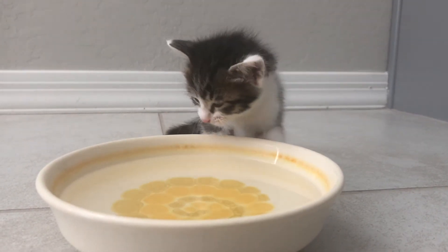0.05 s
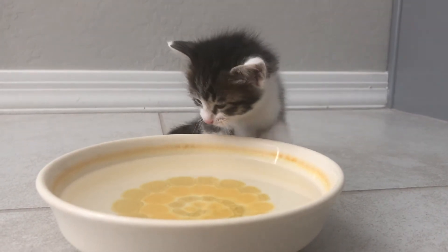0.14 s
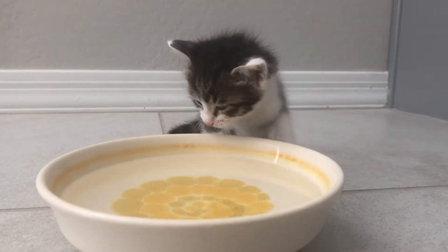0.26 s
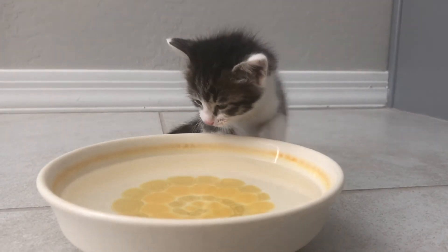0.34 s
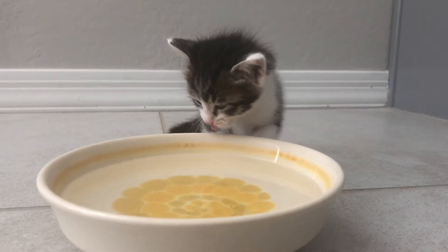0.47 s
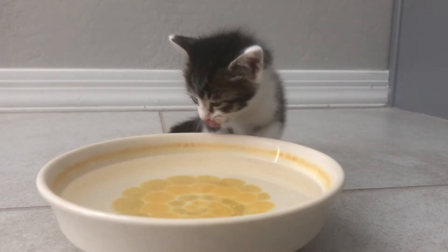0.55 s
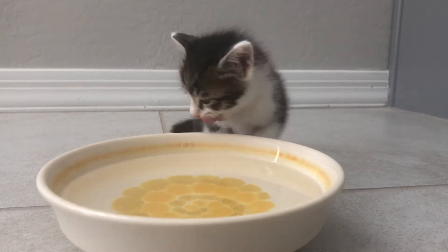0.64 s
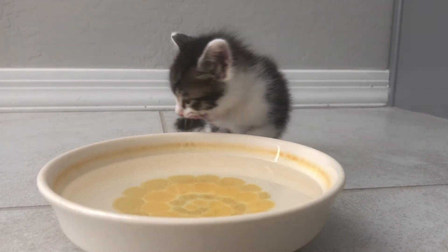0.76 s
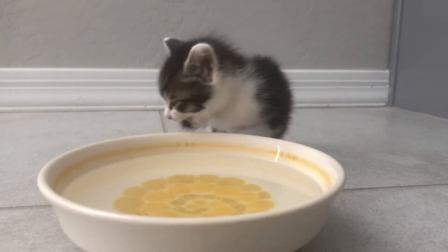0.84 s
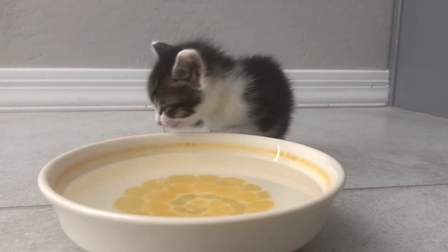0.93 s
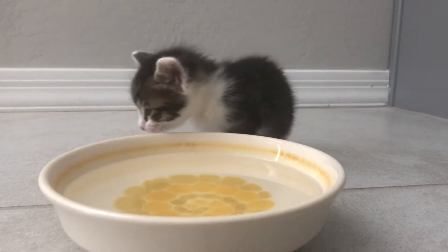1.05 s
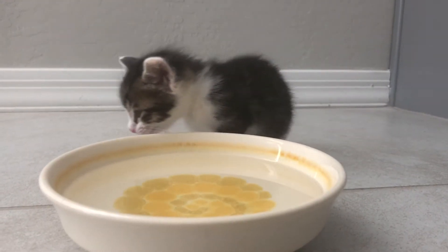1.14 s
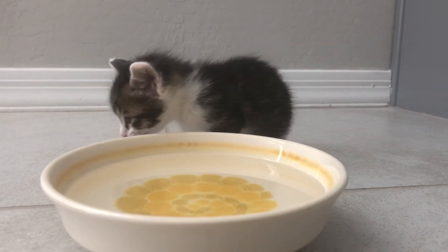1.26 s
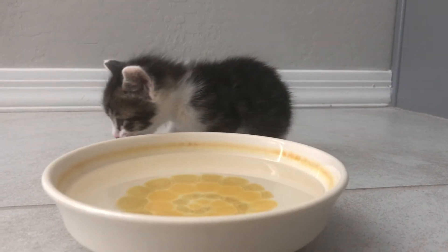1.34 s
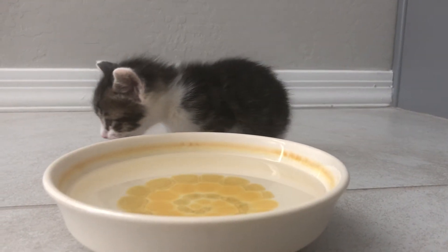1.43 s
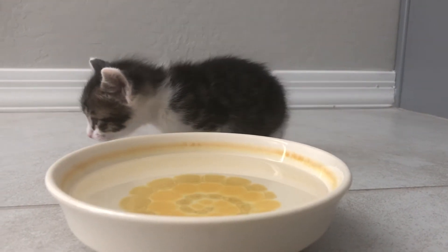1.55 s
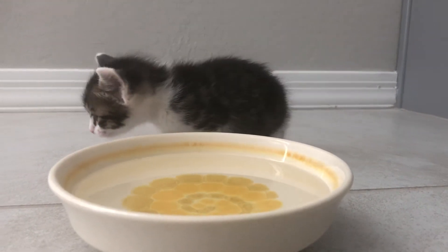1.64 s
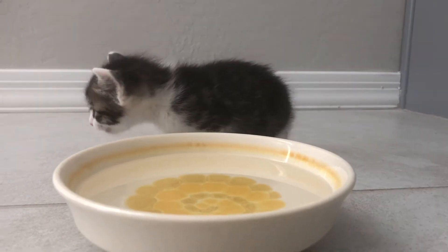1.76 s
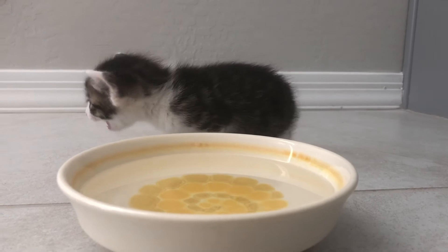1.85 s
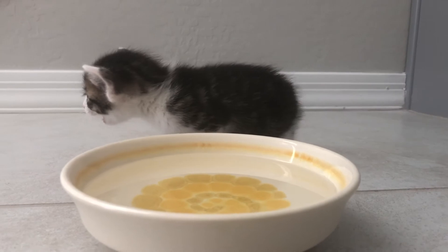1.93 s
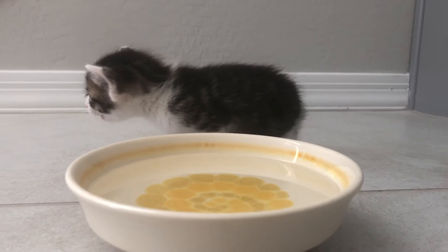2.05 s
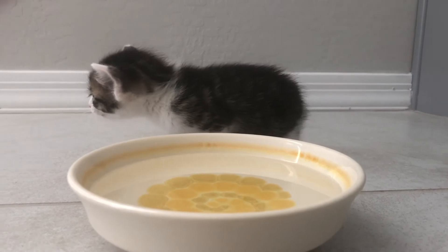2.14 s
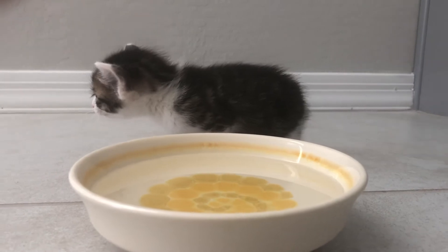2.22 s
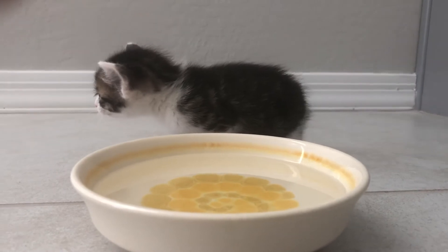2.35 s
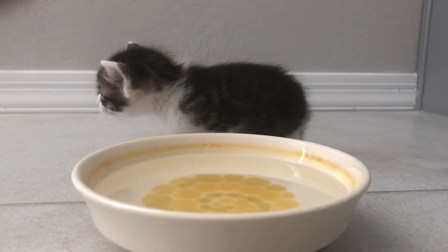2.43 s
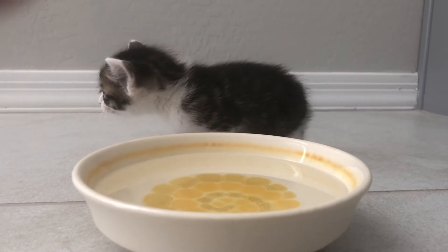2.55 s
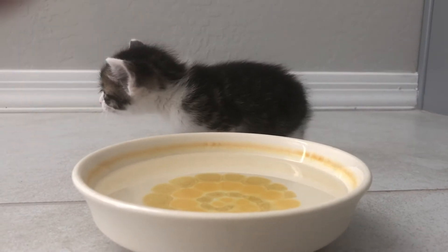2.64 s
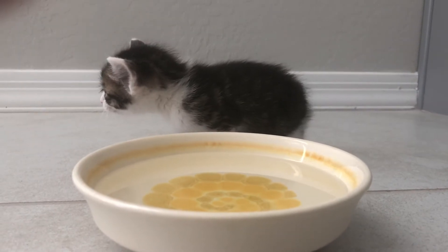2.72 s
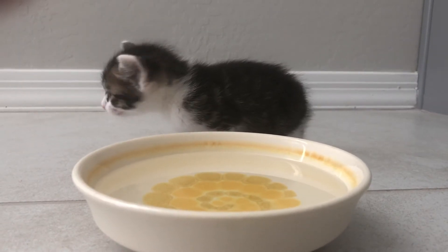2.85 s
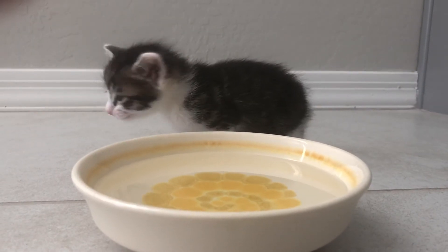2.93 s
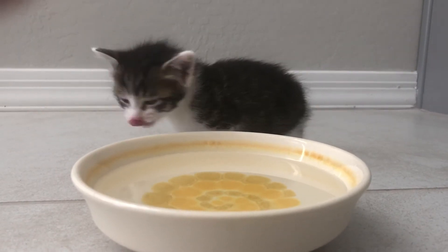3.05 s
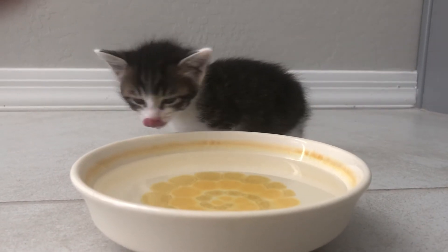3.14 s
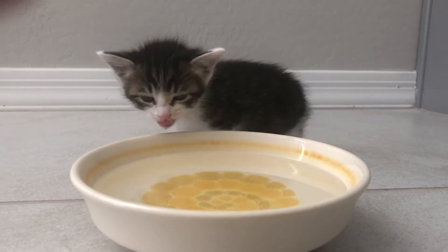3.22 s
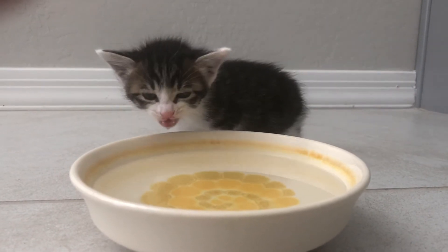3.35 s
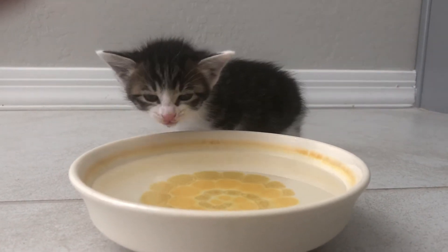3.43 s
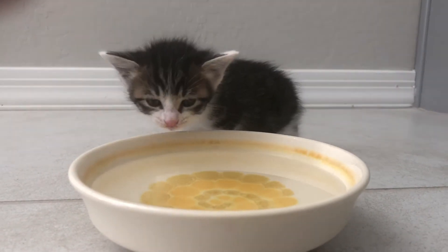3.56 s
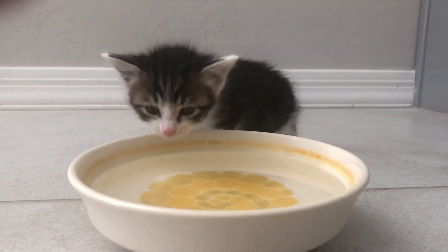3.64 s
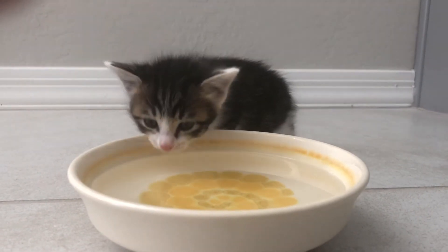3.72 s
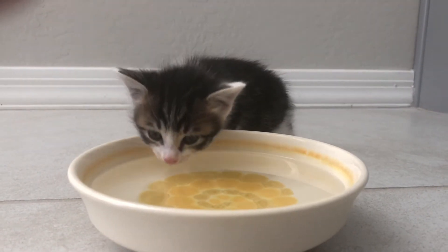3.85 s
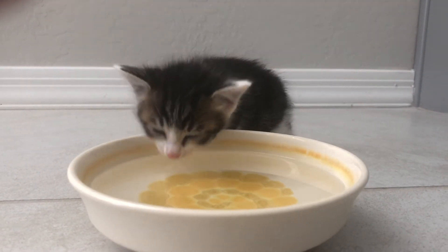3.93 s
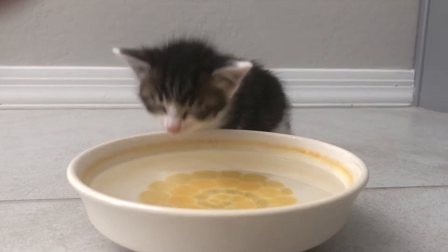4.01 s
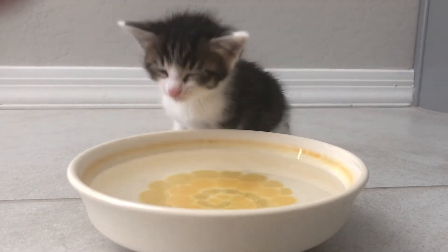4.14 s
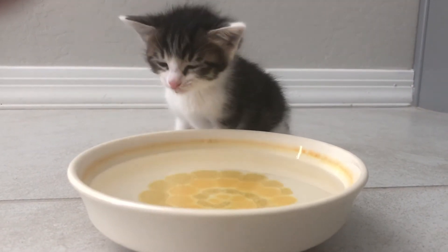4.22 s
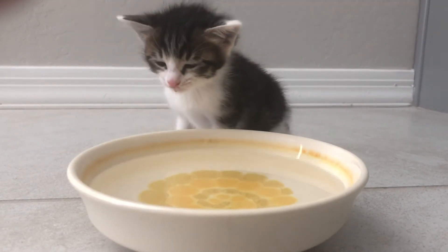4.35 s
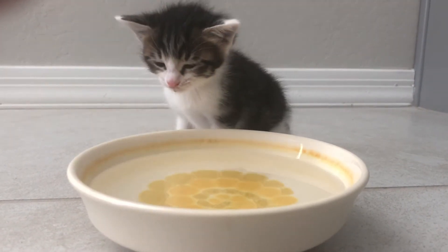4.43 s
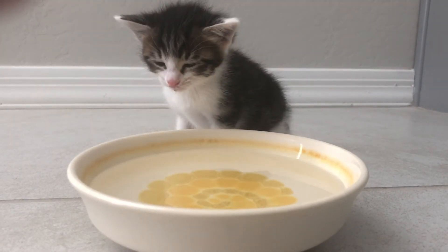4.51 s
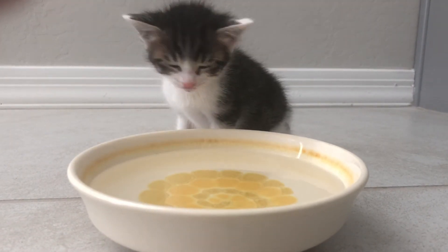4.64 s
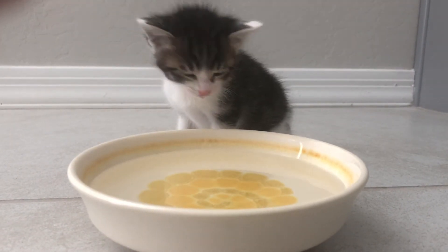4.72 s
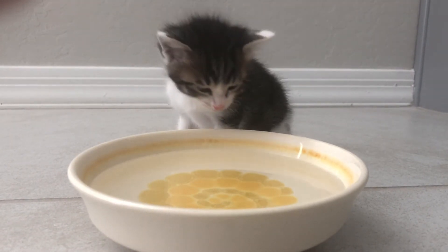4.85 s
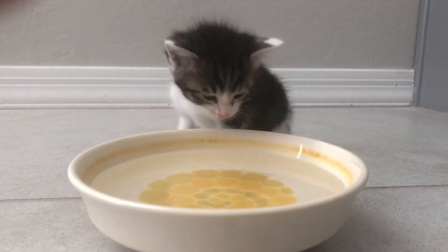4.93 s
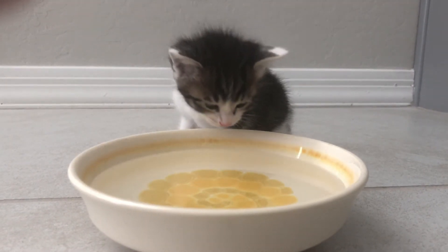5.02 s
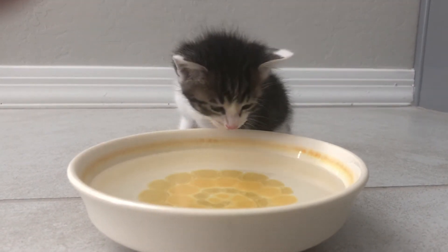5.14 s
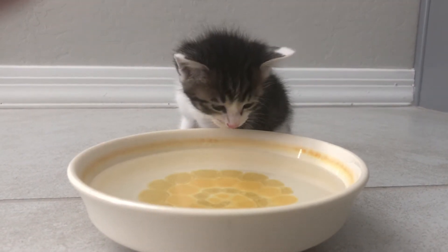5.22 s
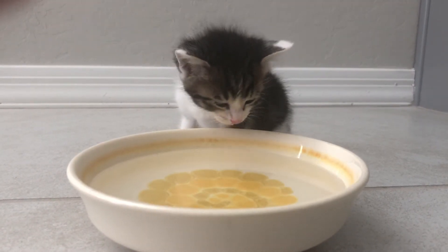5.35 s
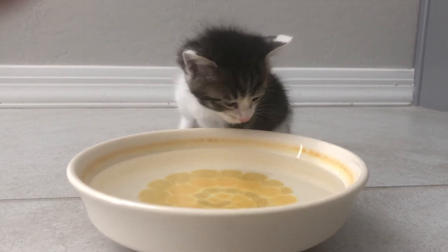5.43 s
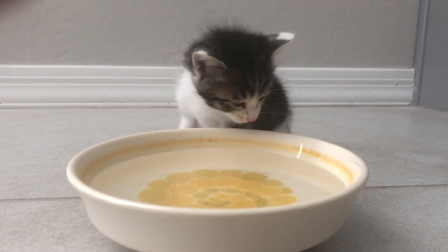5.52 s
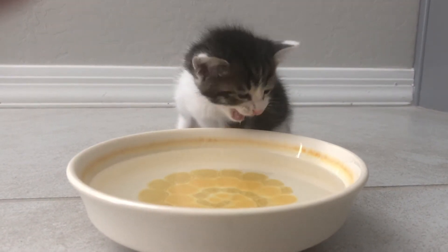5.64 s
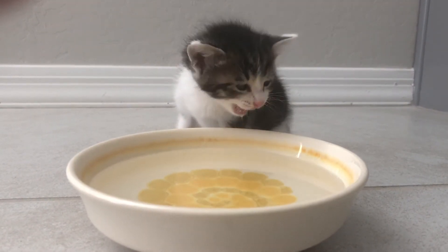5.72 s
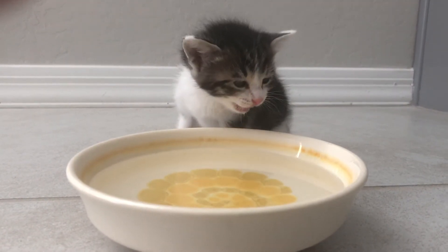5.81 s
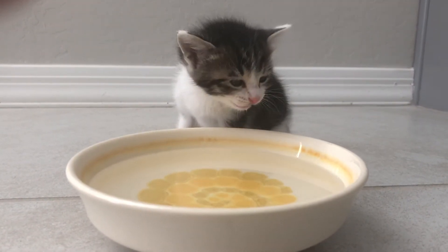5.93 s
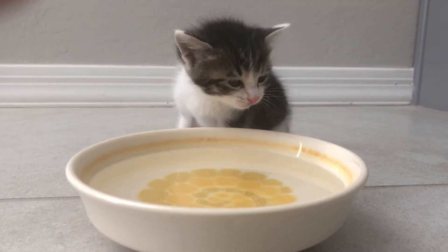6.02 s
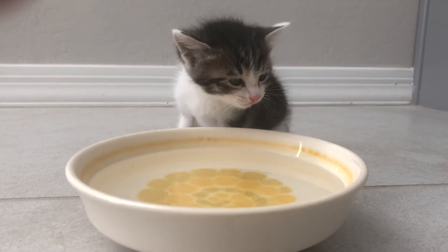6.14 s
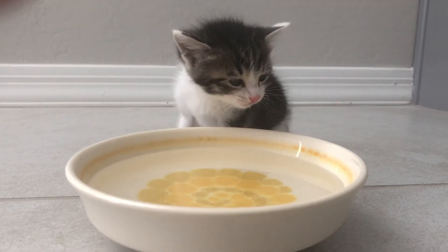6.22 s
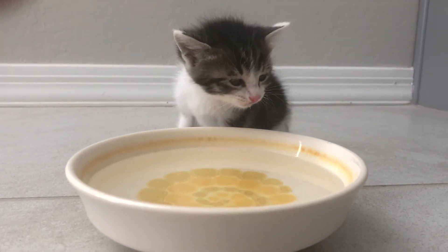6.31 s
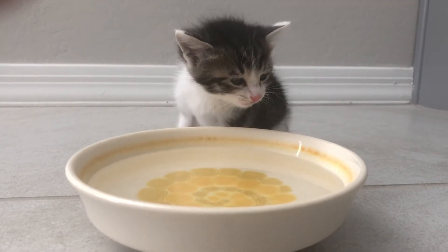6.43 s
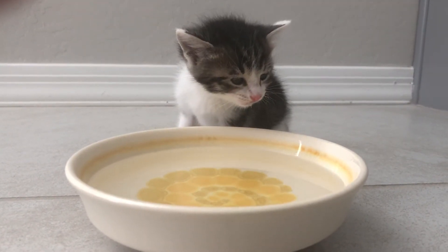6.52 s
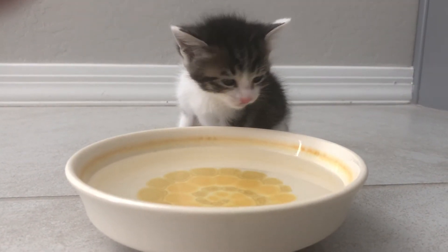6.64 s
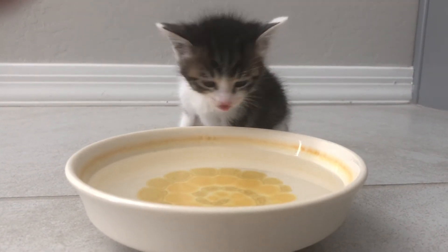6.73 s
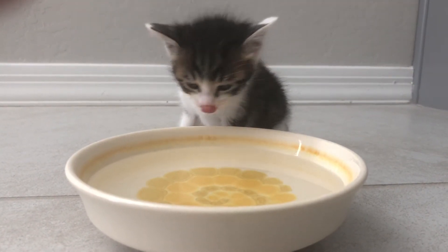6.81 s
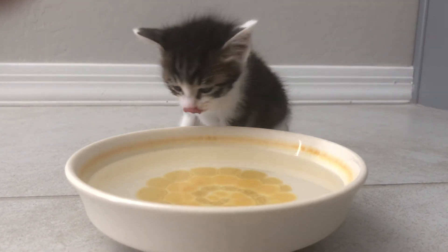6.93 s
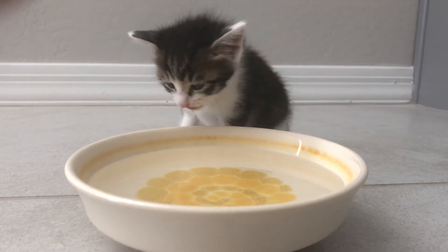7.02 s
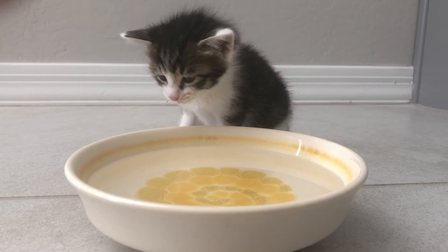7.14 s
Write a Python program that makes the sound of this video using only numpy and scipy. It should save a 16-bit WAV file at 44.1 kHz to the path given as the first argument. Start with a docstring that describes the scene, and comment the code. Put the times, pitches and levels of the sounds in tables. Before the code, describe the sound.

Three short, high kitten meows echo off hard walls, with tiny mouth clicks and a low, steady ventilation hum.

```python
"""Three thin kitten meows ring out in a bare tiled room, over a faint rumble of ventilation.
Each meow is a buzz from the vocal folds that rises and falls in pitch as the mouth opens and shuts.
Before them, one light tap sets a china water bowl ringing; lips, tongue and claws add tiny clicks.
The hard floor and walls send the kitten's sounds and the tap back as echoes."""
import sys
import numpy as np
from scipy import signal
from scipy.fft import rfft, irfft, next_fast_len
from scipy.io import wavfile
from scipy.ndimage import uniform_filter1d

SR = 44100
rng = np.random.default_rng(int(sys.argv[2]) if len(sys.argv) > 2 else 0)


def bounce(signal):
    """Save signal as a 16-bit WAV file at the path given by the first command-line argument."""
    frames = np.transpose(np.atleast_2d(signal))
    limited = np.clip(frames, -1, 1)
    pcm = np.round(limited * 32767).astype(np.int16)
    wavfile.write(sys.argv[1], SR, pcm)


N = 316329


def kitten(beam_miss_share=0.33):
    """Three meows, each sent two ways: straight to the listener, and toward the walls."""
    # each meow's tune, an arch and then a small lift behind the closed mouth: (time [s], pitch [Hz])
    tunes = [[(1.841, 703), (1.86, 735), (1.875, 964), (1.9, 1072), (1.899, 1365), (1.936, 1357),
              (1.945, 1244), (1.991, 1269), (2.011, 1179), (2.111, 1107), (2.166, 1040), (2.243, 1164),
              (2.325, 979)], [(3.257, 895), (3.281, 1038), (3.304, 1110), (3.336, 1157), (3.369, 1182),
                               (3.405, 1160), (3.463, 1059), (3.475, 1116), (3.519, 1057), (3.569, 1042),
                               (3.599, 1158), (3.637, 1129), (3.669, 929)], [(5.612, 854), (5.631, 1031), (5.656, 1071), (5.686, 1199),
                                                (5.717, 1266), (5.757, 1232), (5.795, 1152), (5.857, 1065),
                                                (5.923, 1184), (5.953, 1114), (5.977, 1202), (6.029, 1049),
                                                (6.047, 954)]]
    # how each meow unfolds: (mouth wide at [s], starts closing at [s], narrowing time [s],
    # closing time [s], settling time [s], swell time [s], open level [dB], closed level [dB],
    # base roughness [0-1], pitch shake at full roughness [share], relative hiss [dB])
    meows = [(2.02, 2.171, 0.066, 0.02, 0.23, .04, -20, -36.5, 0.1, 0.034, 3),
             (3.343, 3.461, 0.055, 0.014, 0.29, 0.042, -16.5, -24.5, 0.08, 0.02, 6),
             (5.705, 5.833, 0.053, 0.093, .06, 0.071, -12, -30.5, 0.11, 0.036, 1)]
    # the mouth's resonances (the pitches it boosts) and the tilt from low to high overtones, per meow:
    # (parting jaw [Hz], wide jaw [Hz], parting tongue [Hz], wide tongue [Hz], lips [Hz],
    # wide lip boost [dB], narrow lip boost [dB], open tilt [dB/octave], closed tilt [dB/octave])
    mouths = [(3230, 2684, 5000, 4130, 10700, 7, 18.5, -2.5, -1),
              (2300, 3180, 5450, 5140, 10530, -2.5, 32.5, -1, -2),
              (2815, 2775, 5730, 4680, 11040, 15.5, 31.5, -2.5, 0.5)]
    # narrow dips in the tone, one list per meow: (centre [Hz], width [Hz], depth [dB])
    notches = [
        [(1100, 89, -13.5), (4120, 350, -7.5), (5470, 800, -15), (7625, 1500, -9)],
        [(1210, 63, -10), (3566, 270, -3.5), (6710, 380, -14), (9700, 500, -5.5)],
        [(1246, 42, -11), (6100, 300, -3.5), (8700, 1900, -3)],
    ]
    # what the turning head sends to the walls, per meow:
    # (level [dB], treble change [dB], centre of the beamed band [Hz], its boost [dB])
    headings = [(-2, -10.5, 5300, 23), (-5.5, -6.5, 3200, 14.5), (-2.3, 5, 4700, -4.5)]
    direct, to_walls = np.zeros(N), np.zeros(N)
    for tune, call, mouth, dips, heading in zip(tunes, meows, mouths, notches, headings):
        *effort, jitter, hiss_db = call
        wall_db, treble_db, beam_hz, beam_db = heading
        start_s = tune[0][0]
        cry = meow(voice_motion(tune, mouth, effort), dips, jitter, hiss_db)
        # a band beamed at the walls partly passes the listener by
        add(direct, start_s, head_turn(cry, 0, beam_hz, -beam_miss_share * beam_db))
        add(to_walls, start_s, from_db(wall_db) * head_turn(cry, treble_db, beam_hz, beam_db))
    return direct, to_walls


def meow(motion, dips, jitter, hiss_db, shimmer=0.35, rasp_db=-22.5, doubling=0.24, shut_db=-6):
    """The vocal folds buzz at whole multiples of the pitch (harmonics); the mouth boosts some of them."""
    # steady tone colour of throat and nose: (frequency [Hz], relative level [dB])
    throat = [(800, 9.6), (2300, 1.5), (3500, -10), (5000, -9.5), (6500, -10.5), (8000, -6), (11000, -13.5),
              (14000, -8.5), (16000, -18)]
    t, pitch, level_db, jaw_hz, tongue_hz, lip_hz, lip_db, tilt_db, rough = motion
    # the pitch glides smoothly, and shakes when the voice is rough
    pitch = uniform_filter1d(pitch, size=80, mode="nearest") * (1 + 0.0012 * wobble(60, len(t)))
    pitch = pitch * (1 + jitter * rough * wobble(350, len(t)))
    harmonics = np.arange(1, 18)[:, None]
    hz = harmonics * pitch
    phase = 2 * np.pi * np.cumsum(hz, axis=1) / SR
    colour_db = at_hz(throat, hz) + tilt_db * np.log2(harmonics)
    # each resonance lifts the harmonics near it and shifts their waves in time
    resonances = [(jaw_hz, 1370, 27.1), (tongue_hz, 2430, 29.9), (lip_hz, 3530, lip_db)]
    for centre_hz, width_hz, boost_db in resonances:
        distance = 2 * (hz - centre_hz) / width_hz
        colour_db += boost_db / (1 + distance ** 2)
        phase -= np.arctan(2 * distance)
    for centre_hz, width_hz, depth_db in dips:
        colour_db += depth_db / (1 + (2 * (hz - centre_hz) / width_hz) ** 2)
    # the shutting jaw muffles overtones but spares the lowest note
    shut = np.clip((1700 - jaw_hz) / 600, 0, 1)
    colour_db += shut * shut_db * (harmonics > 1) * (hz < 6500)
    # high overtones swell and fade, each on its own, as the head moves
    flicker = np.array([wobble(14, len(t)) for _ in harmonics])
    colour_db += 3.5 * np.clip(hz / 9000, 0, 1) ** 2 * flicker
    gains = from_db(colour_db) * (hz < SR * 0.45)
    gains /= np.sqrt(np.sum(gains ** 2, axis=0) / 2)  # same power whatever the colour
    voice = np.sum(gains * np.sin(phase), axis=0)
    # a rough voice trembles in loudness and alternates strong and weak cycles
    voice *= 1 + shimmer * rough * wobble(450, len(t))
    voice *= 1 + doubling * rough ** 2 * np.cos(np.pi * np.cumsum(pitch) / SR)
    # swirling air at the folds wraps each harmonic in noise, more so in the treble
    swirl = np.array([wobble(540, len(t)) for _ in harmonics])
    breath = swirl * (from_db(rasp_db) + from_db(hiss_db) * (hz / lip_hz) ** 2)
    rasp = rough * np.sum(gains * breath * np.cos(phase), axis=0)
    fade = np.clip(np.minimum(t - t[0], t[-1] - t) / 0.011, 0, 1)
    return from_db(level_db) * fade * (voice + rasp)


def voice_motion(tune, mouth, effort, onset_s=0.012, release_s=0.04):
    """One meow over time: it swells as the mouth opens, drops as it closes and trails off."""
    wide_s, close_s, narrowing_s, closing_s, settling_s, swell_s, open_db, closed_db, base_rough = effort
    # hoarse stretches, where the voice cracks or runs out: (start [s], end [s], extra roughness [0-1])
    hoarse_spans = [(1.904, 2.003, .33), (5.967, 6.05, 0.14)]
    times, pitches = np.transpose(tune)
    t = np.arange(times[0], times[-1], 1 / SR)
    onset = np.exp(-(t - t[0]) / onset_s)
    closed = ramp(t, close_s, closing_s)
    release = ramp(t, t[-1] - release_s, release_s)
    # the first meow warbles as it cracks upward and falls back
    warble_from_s, warble_to_s, warble_hz, warble_share = 1.7, 1.994, 38, 0.039
    warble = (t > warble_from_s) * (t < warble_to_s) * np.sin(2 * np.pi * warble_hz * (t - warble_from_s))
    pitch = np.interp(t, times, pitches) * (1 - warble_share * warble)
    # the voice is softer, duller and rougher at both ends
    swell_db = -28.5 * np.exp(-(t - t[0]) / swell_s)
    level_db = open_db + swell_db + (closed_db - open_db) * closed - 10.5 * release
    jaw_hz, tongue_hz, lip_hz, lip_db, tilt_db = mouth_shape(
        t, mouth, wide_s, close_s, narrowing_s, closing_s, settling_s)
    tilt_db -= 10.5 * onset + 5 * release
    hoarse = sum(extra * (t > start_s) * (t < end_s) for start_s, end_s, extra in hoarse_spans)
    rough = base_rough + 0.78 * onset + hoarse + 0.031 * closed + 0.2 * release
    # behind the closed mouth the overtones die away
    closed_for_s = np.maximum(t - close_s - closing_s, 0)
    lip_db -= 70 * closed_for_s
    tilt_db -= 17 * closed_for_s
    return t, pitch, level_db, jaw_hz, tongue_hz, lip_hz, lip_db, tilt_db, rough


def mouth_shape(t, mouth, wide_s, close_s, narrowing_s, closing_s, settling_s):
    """The resonances move as the mouth parts, opens wide, sags, narrows, closes and settles to a hum."""
    parting_jaw_hz, wide_jaw_hz, parting_tongue_hz, wide_tongue_hz, lip_hz = mouth[:5]
    wide_lip_db, narrow_lip_db, open_tilt_db, closed_tilt_db = mouth[5:]
    # mouth shapes: (time [s], jaw [Hz], tongue [Hz], lip boost [dB], tilt [dB/octave])
    parted = (t[0], parting_jaw_hz, parting_tongue_hz, wide_lip_db + 10.5, open_tilt_db - 6.5)
    wide = (wide_s, wide_jaw_hz, wide_tongue_hz, wide_lip_db, open_tilt_db)
    sagged = (close_s - narrowing_s, wide_jaw_hz - 89.8, wide_tongue_hz - 196.4, *wide[3:])
    narrow = (close_s, 2122, 4246, narrow_lip_db, open_tilt_db - 5.5)
    closed = (close_s + closing_s, 1610, 3995, 8, closed_tilt_db)
    humming = (close_s + closing_s + settling_s, 933, 4030, 4.5, closed_tilt_db + 1.5)
    times, *columns = np.transpose([parted, wide, sagged, narrow, closed, humming])
    jaw_hz, tongue_hz, lip_db, tilt_db = [np.interp(t, times, column) for column in columns]
    return jaw_hz, tongue_hz, lip_hz, lip_db, tilt_db


def head_turn(sound, treble_db, beam_hz, beam_db, treble_from_hz=3200, beam_width_hz=1000):
    """The mouth beams its treble, one band most of all, so the tone depends on where the head points."""
    treble = signal.sosfiltfilt(signal.butter(2, treble_from_hz, "high", fs=SR, output="sos"), sound)
    tilted = sound + (from_db(treble_db) - 1) * treble
    beam = signal.filtfilt(*signal.iirpeak(beam_hz, beam_hz / beam_width_hz, fs=SR), tilted)
    return tilted + (from_db(beam_db) - 1) * beam


def bowl_tap(crack_db=-1, crack_s=0.006):
    """A light touch makes a short crack of noise and sets the china ringing."""
    # the bowl's ringing tones: (frequency [Hz], relative level [dB], time to fade by 60 dB [s])
    tones = [(1870, -17, 0.75), (3098, -1, 0.3), (4550, -2, 0.124), (6280, -1, 0.05), (6806, -9, 0.2),
             (10030, -12, .09), (12200, -11, 0.16), (13230, -14, .07), (14680, -14, .06)]
    t = np.arange(SR) / SR
    ring = sum(from_db(db - 60 * t / fade_s) * np.sin(2 * np.pi * hz * t) for hz, db, fade_s in tones)
    crack = np.diff(rng.standard_normal(len(t) + 1)) / 2 * np.exp(-t / crack_s)
    return ring + from_db(crack_db) * crack


def click(centre_hz, width_hz, decay_s=0.0015):
    """A tiny snap of lips, tongue or claw rings for an instant around one frequency."""
    t = np.arange(SR // 40) / SR
    snap = rng.standard_normal(len(t)) * np.exp(-t / decay_s)
    feedback = np.exp(-2 * np.pi * width_hz / SR)
    angle = 2 * np.pi * centre_hz / SR
    resonance = [0.95, 0, -2.5, 1, -(1 + feedback) * np.cos(angle), feedback]
    sound = signal.sosfilt([resonance] * 2, snap)
    return sound / np.abs(sound).max()


def room(sound, build_up_s=0.004):
    """Tiles return a few clear echoes, then a wash of blurred ones whose treble dies first."""
    # first echoes from floor and walls: (delay [s], level [dB])
    echoes = [(.0023, -38.5), (.0061, -15.5), (0.0103, -10.5)]
    # the lingering wash: (frequency [Hz], level [dB], time to fade by 60 dB [s])
    wash = [(500, -32.5, 0.68), (1110, -9, 1.62), (2040, -6.5, 1.397), (3700, -16, 1.16), (4070, -12, 1.4),
            (6300, -9, 0.65), (9900, -3.5, 0.32), (15000, -20.5, .25)]
    t = np.arange(2 * SR) / SR
    freqs = np.fft.rfftfreq(len(t), 1 / SR)
    noise = rfft(rng.standard_normal(len(t)))
    edges_hz = np.geomspace(300, 18000, 19)
    response = np.zeros(len(t))
    for low, high in zip(edges_hz, edges_hz[1:]):
        hz = np.sqrt(low * high)
        decay = from_db(-60 * t / at_hz(wash, hz, column=2)) * (1 - np.exp(-t / build_up_s))
        band = irfft(noise * (freqs >= low) * (freqs < high))
        response += from_db(at_hz(wash, hz)) * band * decay / np.linalg.norm(decay)
    for delay_s, db in echoes:
        add(response, delay_s, from_db([db]))
    return signal.fftconvolve(sound, response)[:N]


def ventilation(rumble_db=-52.5, hiss_db=-67.5, split_hz=700):
    """A duct rumbles, moving air hisses and the fan motor adds a wavering hum."""
    # tone colours of the duct and of the air: (frequency [Hz], relative level [dB])
    rumble_colour = [(12, -46), (20, -14.5), (49, -1.5), (70, -0.5), (91, -8.5), (125, -6), (151, -10),
                     (266, -4.5), (304, -13), (343, -4.5), (386, -12.5), (455, -13.5), (700, -25),
                     (910, -54), (1540, -120)]
    hiss_colour = [(410, -32), (700, -2.5), (777, -2.5), (851, -6.5), (1030, -6), (1120, -6.5),
                   (1160, -9.5), (2010, -12.5), (2200, -10), (2380, -14.5), (3290, -21), (6310, -23.5),
                   (15700, -34)]
    # the fan motor's tones: (frequency [Hz], average level [dB])
    motor_tones = [(59.2, -64), (118.5, -66), (274.5, -64.5)]
    t = np.arange(N) / SR
    size = next_fast_len(N)
    freqs = np.fft.rfftfreq(size, 1 / SR)
    noise = rfft(rng.standard_normal(size))
    rumble = rms_one(irfft(noise * from_db(at_hz(rumble_colour, freqs)) * (freqs < split_hz))[:N])
    hiss = rms_one(irfft(noise * from_db(at_hz(hiss_colour, freqs)) * (freqs >= split_hz))[:N])
    hum = sum(from_db(db) * np.sqrt(2) * np.sin(2 * np.pi * hz * t + 2.3 * wobble(4, N))
              for hz, db in motor_tones)
    return from_db(rumble_db) * rumble + from_db(hiss_db) * hiss + hum


def from_db(db):
    """Turn decibels into a number to multiply a sound by."""
    return 10 ** (np.asarray(db) / 20)


def rms_one(x):
    """Scale a signal so that its average size (root mean square) is 1."""
    return x / np.sqrt(np.mean(x ** 2) + 1e-20)


def at_hz(table, hz, column=1):
    """Read between a table's rows at any frequency, with octaves evenly spaced."""
    table = np.array(table)
    return np.interp(np.log(hz + 1e-9), np.log(table[:, 0]), table[:, column])


def add(track, start_s, sound):
    """Mix a sound into a track at the given time."""
    start = int(round(start_s * SR))
    track[start:start + len(sound)] += sound[:len(track) - start]


def wobble(hz, size):
    """A random wander of average size 1, mostly slower than hz."""
    padded = next_fast_len(2 * size)
    freqs = np.fft.rfftfreq(padded, 1 / SR)
    noise = rfft(rng.standard_normal(padded))
    return rms_one(irfft(noise / (1 + (freqs / hz) ** 4))[:size])


def ramp(t, start_s, length_s):
    """Rise from 0 to 1 along a straight line."""
    return np.clip((t - start_s) / length_s, 0, 1)


def scene(small_sounds_to_walls_db=-3.5):
    """Kitten and bowl close by, with the room's echoes and the ventilation around them."""
    # clicks of lips, tongue and claws: (time [s], peak level [dB], centre [Hz], width [Hz])
    clicks = [(.473, -59, 5500, 2000), (.510, -59, 6500, 2500), (.634, -56, 4000, 2500),
              (1.182, -47.5, 6400, 3500), (1.305, -51, 1400, 1600), (1.661, -49, 1690, 2000),
              (1.783, -45, 10000, 9000), (1.833, -46.5, 11860, 9000), (1.85, -42.5, 3923, 3400),
              (3.257, -33, 1061, 596), (3.281, -32, 2350, 1100), (3.280, -40, 8660, 2505),
              (5.612, -36, 950, 500), (5.605, -52.5, 6000, 4420), (5.612, -44, 5960, 4003),
              (6.841, -45.5, 9500, 10900)]
    # the tap on the bowl: (time [s], gain [dB])
    taps = [(0.42, -47)]
    small_sounds = np.zeros(N)
    for start_s, db, centre_hz, width_hz in clicks:
        add(small_sounds, start_s, from_db(db) * click(centre_hz, width_hz))
    for start_s, db in taps:
        add(small_sounds, start_s, from_db(db) * bowl_tap())
    meows, to_walls = kitten()
    to_walls += from_db(small_sounds_to_walls_db) * small_sounds
    return (meows + small_sounds + room(to_walls) + ventilation())[None]


def record(dry, lowest_hz=36, highest_hz=15850):
    """The microphone drops the deepest bass, and the highest treble is cut steeply."""
    thin = signal.sosfilt(signal.butter(6, lowest_hz, "high", fs=SR, output="sos"), dry)
    return signal.sosfilt(signal.ellip(12, 0.1, 80, highest_hz, fs=SR, output="sos"), thin)


dry = scene()
out = record(dry)
bounce(out)
```